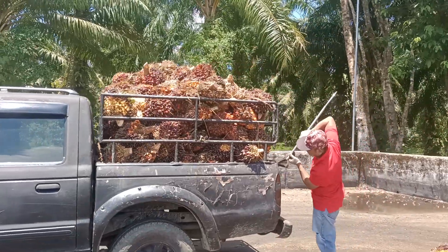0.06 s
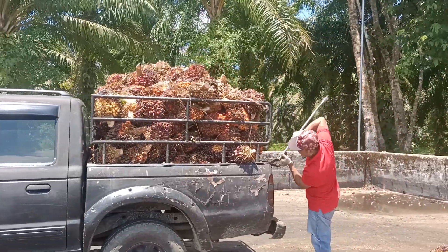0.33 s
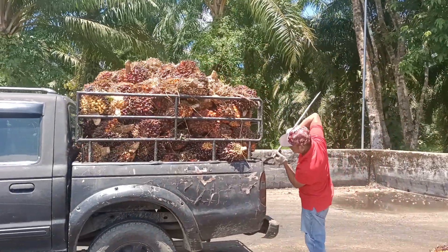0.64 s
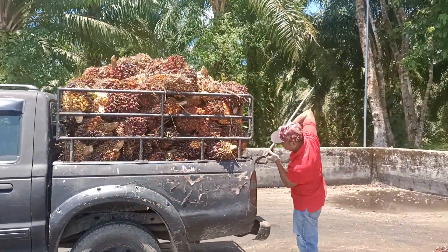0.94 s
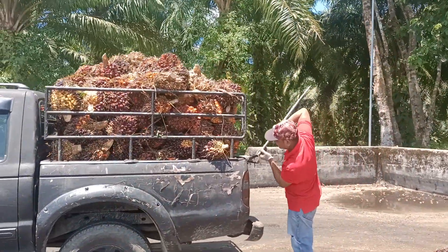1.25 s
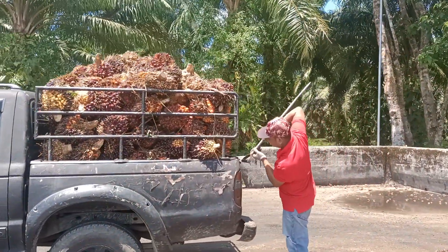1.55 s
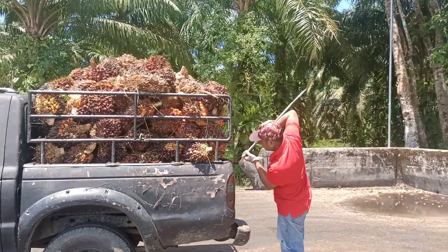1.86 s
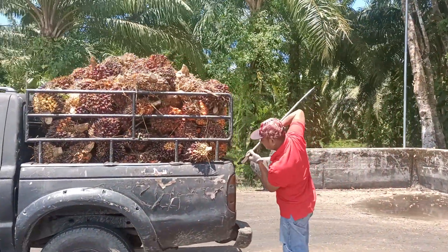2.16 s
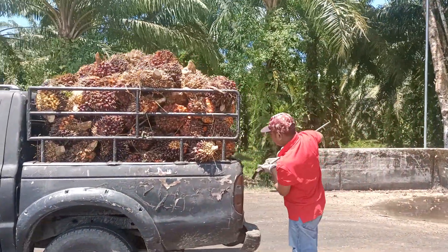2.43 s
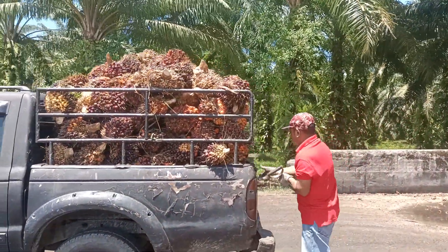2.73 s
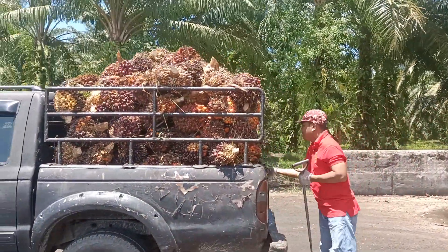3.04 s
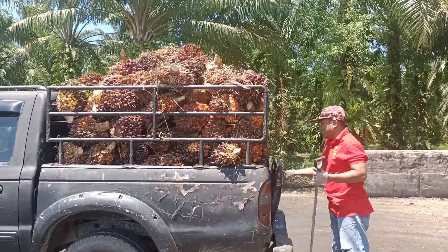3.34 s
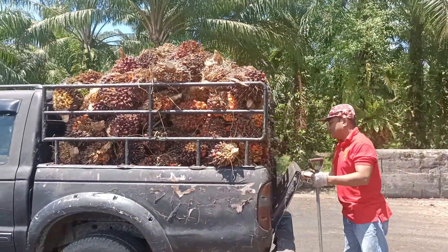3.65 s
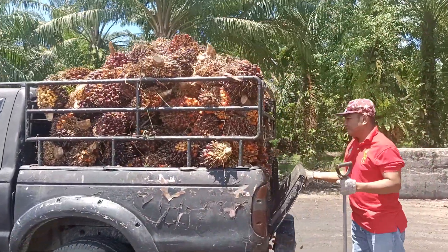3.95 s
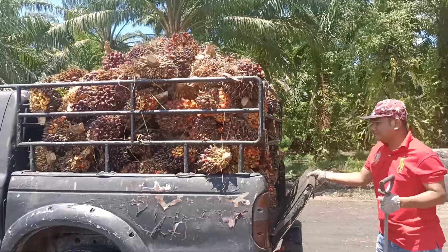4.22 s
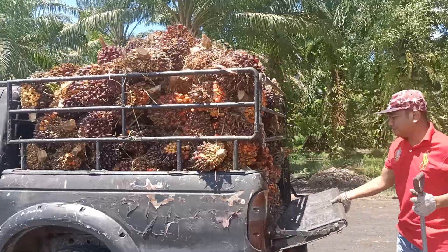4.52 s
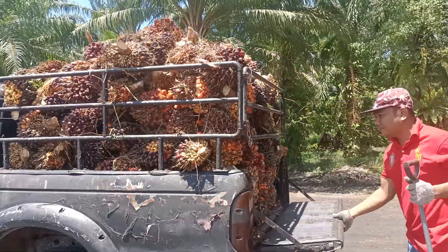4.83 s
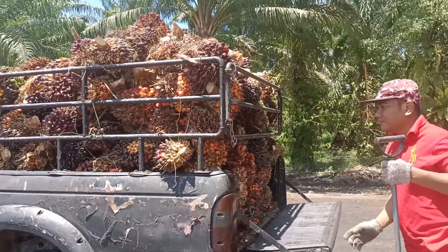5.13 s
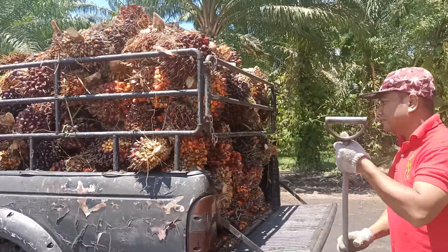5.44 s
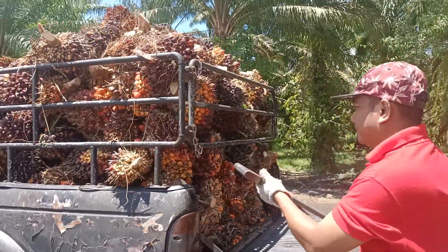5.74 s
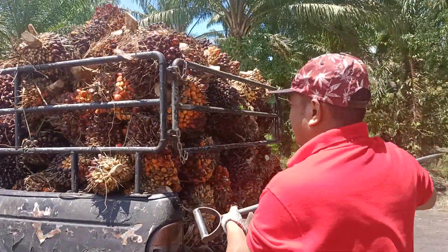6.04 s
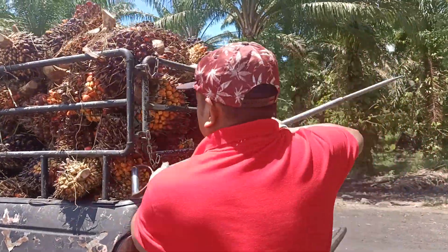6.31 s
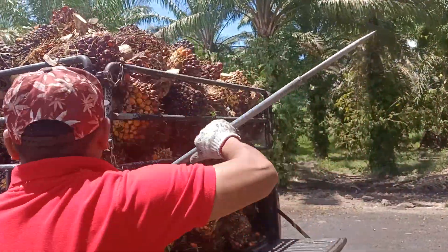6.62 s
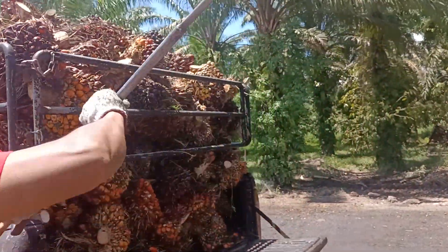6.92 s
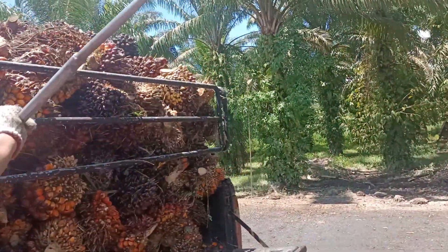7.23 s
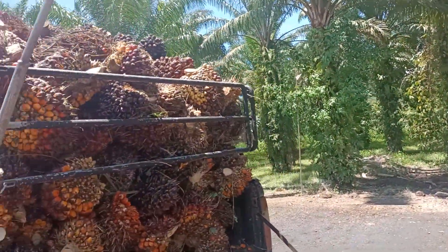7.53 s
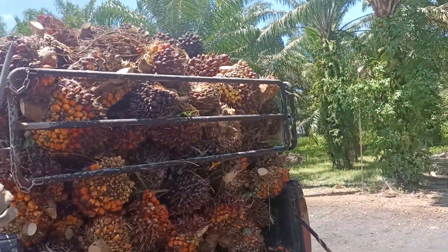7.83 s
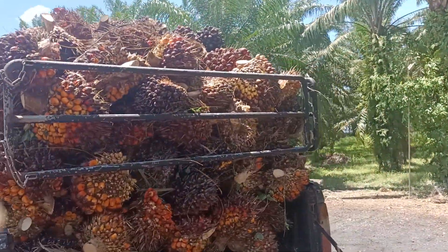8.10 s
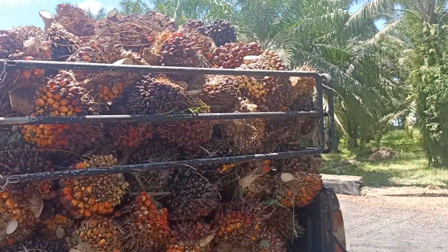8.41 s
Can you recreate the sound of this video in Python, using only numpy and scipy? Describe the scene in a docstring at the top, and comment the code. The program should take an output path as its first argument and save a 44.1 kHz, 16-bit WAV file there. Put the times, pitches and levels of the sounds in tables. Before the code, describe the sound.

A steel rod clangs on a pickup's tailgate latch, the gate crashes open as fruit tumbles, then closer blows rattle a rack and chain.

```python
"""A steel rod knocks six times on the tailgate latch of a loaded pickup, ringing on after the blows.
The microphone stands in an open yard, the gate a little way off to its right. The gate bursts open,
palm fruit tumbles against the sheet steel, and it drops onto its stays. Close by on the left, three
blows ring the tube rack and shake its chain. Dry husks rustle in the load, insects and a far bird
sound faintly in the palms, and a light breeze touches the microphone."""
import sys
import numpy as np
from scipy import signal
from scipy.fft import rfft, irfft, next_fast_len
from scipy.io import wavfile
from scipy.ndimage import map_coordinates

SR = 44100
rng = np.random.default_rng(int(sys.argv[2]) if len(sys.argv) > 2 else 0)


def int16_out(signal):
    """Quantize to a 16-bit WAV file."""
    q = np.round(np.clip(np.atleast_2d(signal).T, -1, 1) * 32767)
    wavfile.write(sys.argv[1], SR, q.astype(np.int16))


N = 377937
T = np.arange(SR) / SR  # seconds since a blow

# rod on the latch: start_s, clang_db, bed_boom_db, rod_low_db, rod_high_db (all levels are relative)
LATCH_BLOWS = [(-.018, -13, -24.5, -48.5, -32.5), (.491, -14, -28, -47, -49),
               (.878, -13.5, -28, -40.5, -34.5), (1.211, -11, -23, -31, -30),
               (1.529, -12.5, -22, -27.5, -61), (1.921, -9, -23.5, -57, -34)]
# the rod's bending modes: pitch_hz, t60_s
ROD_MODES = [(1136, 1.15), (4382, .8)]
# the gate strains, bursts open, then lands: start_s, crash_db, boom_db, clatter_s, rise_s
SLAMS = [(2.938, -62, -45.5, 0.085, 0.025), (3.363, -14.5, -16, 0.023, 0.0027),
         (4.714, -10.5, -17.5, 0.066, 0.042)]
# the heaviest bunches hit the gate: start_s, knock_db, scratch_db
BUNCH_HITS = [(3.029, -46.5, -55), (3.141, -45.5, -56), (3.617, -28.5, -68), (3.712, -34, -73),
              (3.756, -33.5, -64), (3.897, -30.5, -38.5), (3.993, -34.5, -43), (4.093, -20.5, -32.5),
              (4.199, -30.5, -46), (4.264, -34.5, -46), (4.413, -33.5, -38.5), (4.454, -23.5, -35),
              (4.679, -33, -51), (4.748, -27, -20), (4.875, -29, -30), (4.94, -34.5, -35.5)]
# rod on the rack: start_s, clang_db, tubes_db, clatter_s, chain_db
RACK_BLOWS = [(6.462, -11.5, -21, 0.014, -10.5), (6.844, -13, -25, 0.023, -9.5),
              (7.17, -12, -23, 0.038, -18)]
# the rack's tube modes: pitch_hz, level_db
TUBE_MODES = [(139, -8), (191, -1.5), (223, -2.5), (304, -2.5), (398, -0.5), (454, 6), (702, 9), (785, 4.5),
              (1117, 6.5), (1270, -5.5), (1450, -1.5), (1555, 15.5), (1725, -6.5), (1983, 1), (2306, -16.5)]
# dry stalks snap: start_s, level_db
SNAPS = [(2.651, -37), (3.18, -36.5), (3.23, -40), (6.384, -46), (6.772, -28.5), (7.473, -24.5),
         (7.512, -26), (8.452, -9)]
# a far bird: start_s, length_s, first_hz, last_hz, level_db
WHISTLES = [(2.256, 0.25, 5450, 5970, -70), (5.249, 0.074, 3880, 3990, -67)]

# modes of the struck bodies: pitch_hz, level_db, t60_s
ROD_OVERTONES = [(7020, -4, 0.32), (10280, -4.5, 0.24), (12040, 0.5, 0.23)]
LATCH_MODES = [(4530, -3.5, 0.068), (4870, 0.5, .04), (5150, -6.5, 0.072), (7450, -5, .03)]
BED_MODES = [(111, -8.5, 0.2), (138, 1.5, .24), (157, -8, 0.46), (177.8, 4, 0.28), (190, -1.5, 0.27),
             (237, -13.5, 0.35), (298, -2, 0.17), (357, 2.5, .2)]
SHUT_GATE_MODES = [(467, -4.5, 0.3), (485, -4.5, 0.15), (569, -8.5, 0.25), (699, -2, 0.2), (748, -5, 0.27),
                   (831, -2, 0.17), (872, 2, 0.078), (1228, -1, 0.14), (1374, -4.5, 0.22),
                   (1498, -10, 0.084), (1760, -12.5, 0.11), (1924, 3, 0.12)]
LOOSE_GATE_MODES = [(72, -37, 0.48), (106, -3.5, 0.11), (144.5, 0, 0.26), (172, -4.5, 0.32), (207, 4, 0.17),
                    (250, -5, 0.18), (317, -5.5, 0.14), (374.7, -4, 0.17), (440, -9.5, 0.27)]
OPEN_GATE_MODES = [(298.6, -7.5, 0.43), (468, -9, 0.14), (610.2, 0.5, 0.21), (687, -4.5, 0.23),
                   (786, -5.5, 0.15), (1157, 0.5, 0.075), (1603, -3, 0.077), (1988, 4, 0.036)]
LINK_MODES = [(9850, -9.5, .2), (10400, -1.5, .22), (14810, -7, 0.28), (15250, -10.5, .25),
              (15600, -11.5, 0.18)]
STALK_MODES = [(1090, -8.5, 0.011), (1360, -1, 0.014), (1770, -5.5, 0.013), (3250, -1, 0.0028)]

# sounds that swell and die away: start_s, length_s, level_db
SPILLS = [(2.981, 0.73, -65), (3.342, 0.038, -27), (3.588, 0.97, -38.5), (4.772, 0.14, -30.5)]  # fruit trickles behind the gate, pours down it, spills off as it lands
RUSTLES = [(2.56, 0.029, -59.5), (2.98, 0.021, -60), (3.225, .07, -52.5), (5.455, 0.055, -64),
           (5.853, 0.027, -45), (5.975, 0.055, -54), (6.315, 0.071, -46.5), (7.39, 0.013, -36),
           (7.45, 0.057, -38), (7.585, 0.012, -51), (7.96, 0.028, -58), (8.275, 0.2, -48.5)]  # the load settles; the short bursts at 7.39 and 7.45 s sound with the chain's last swing
PUFFS = [(-.03, 0.086, -35), (.16, 0.055, -40), (1.76, 0.19, -44), (7.87, 0.082, -50), (8.06, .13, -36.5),
         (8.46, .04, -57)]  # breeze on the microphone
DRAUGHT = [(0.0099, 2.1, -61)]  # light wind that drops early

# steady background: time_s, level_db
AIR_LEVEL = [(0, -51.5), (2.5, -58), (8.6, -58.5)]
INSECT_LEVEL = [(0, -55), (2, -64.5), (3, -66.5), (5.6, -64.5), (8.6, -66.5)]

# noise spectrum of each source: frequency_hz, level_db
LATCH_COLOUR = [(45, -32.5), (90, -14), (150, -8.5), (400, -4), (900, -3.5), (1850, -3), (2600, -9),
                (3200, -16.5), (4300, -5), (5500, -10), (8000, -15), (10000, -15.5), (15500, -23.5)]
SLAM_COLOUR = [(30, -36.5), (80, -2), (150, -10), (500, -5.5), (950, -12.5), (1200, -6), (1700, -7),
               (2500, -18.5), (3200, -29.5), (4400, -18), (6700, -24), (8000, -26.5), (15500, -36)]
FRUIT_COLOUR = [(70, -54.5), (120, -21), (190, -2.5), (300, -6), (450, -4), (650, -2.5), (1000, -7.5),
                (1950, -13.5), (3000, -33.5), (4500, -28), (8000, -52.5), (15500, -45.5)]
SPINE_COLOUR = [(800, -20.5), (1800, -6), (3000, -7.5), (5000, -1.5), (8000, -6.5), (15000, -16.5)]
RACK_COLOUR = [(50, -39.5), (90, -21.5), (150, -9.5), (450, -11), (700, -2), (950, -4.5), (1550, 2),
               (2500, -4.5), (3500, -11), (4400, -5.5), (6700, -15.5), (8000, -18), (10000, -19),
               (15500, -31.5)]
LOAD_COLOUR = [(80, -27), (140, -7), (200, 0.5), (300, -0.5), (420, -1), (560, -12.5), (1200, -23),
               (3000, -47)]
CHAIN_COLOUR = [(800, -18), (1500, -9.5), (3000, -14.5), (6500, -7.5), (8000, -16), (10500, -5.5),
                (12500, -13.5), (14300, -16), (15200, -5), (16000, -9.5)]
HUSK_COLOUR = [(300, -28.5), (700, -12.5), (1200, -4), (1600, 1), (2100, -3), (3000, -15), (5000, -11),
               (8000, -21.5), (15500, -35)]
FIBRE_COLOUR = [(1000, -12), (2000, -1.5), (5000, 0), (8000, -5.5), (15000, -3)]
BREEZE_COLOUR = [(12, -27), (20, 1), (59, 1.5), (130, -7), (199, -28), (350, -53.5), (460, -87),
                 (770, -120)]
AIR_COLOUR = [(20, 0), (60, -1), (150, 0), (300, -10), (550, -16), (1000, -19), (1700, -17), (3500, -29),
              (5000, -26), (7000, -27), (9500, -28), (12000, -33), (15500, -27)]

# how long the steel, the load and the yard sound on: frequency_hz, t60_s
SHEET_DECAY = [(150, 0.62), (400, .3), (1000, 0.2), (2000, 0.17), (4000, .09), (12000, 0.071)]
SLAM_DECAY = [(50, 0.26), (150, 0.75), (400, 0.43), (1500, 0.081), (6000, 0.36), (12000, 0.26)]
RACK_DECAY = [(150, 0.38), (500, 0.38), (1500, 0.23), (4000, 0.13), (12000, 0.14)]
TUBE_DECAY = [(200, 0.34), (500, 0.2), (1500, 0.16)]
LOAD_DECAY = [(150, 0.2), (600, 0.23)]
YARD_DECAY = [(150, 0.46), (1000, 0.53), (4000, 0.62), (12000, 0.77)]

# left-right likeness of far and near sound at the microphone: frequency_hz, correlation
FAR = [(60, 0.8), (130, .95), (300, 0.9), (640, .82), (1400, 0.5), (3100, 0.2), (7000, 0.6)]
NEAR = [(130, 0.58), (300, 1), (640, 0.73), (1400, 0.088), (7000, 0.17)]
# the two microphone ports ring and cancel at different pitches: frequency_hz, gain_db
LEFT_PORT = [(300, 2), (1500, -1.5), (2600, 0.5), (4400, -5.5), (5300, -6), (6700, -17), (7700, -11),
             (8400, -0.5), (9700, 7.5), (11300, -2.5), (12600, 3), (14000, -6.5), (15300, -8)]
RIGHT_PORT = [(300, 1), (1500, 1), (2600, -2), (4400, 0.5), (5700, -0.5), (6700, 5.5), (8000, -1),
              (8600, -15), (10000, -30.5), (10700, -15), (11400, -15.5), (12700, 0), (14000, 0.5),
              (15300, 7)]


def latch():
    """Each blow cracks on the gate, swells into the truck bed, rebounds and leaves the rod ringing."""
    out = np.zeros((2, N))
    sheet = resonant(LATCH_COLOUR, depth_db=2)
    rebound_decay = [(300, 0.16), (2000, 0.066), (8000, 0.021)]
    next_blows = [row[0] for row in LATCH_BLOWS[1:]] + [N / SR]
    for (s, db, boom_db, *rod_db), next_s in zip(LATCH_BLOWS, next_blows):
        add(out, s, amp(db + 1.5) * clang(sheet, SHEET_DECAY, FAR, hold=.0018, rise=.00052, grain_db=3))
        add(out, s, amp(db - 12.5) * ring(SHUT_GATE_MODES, rise=0.0018))
        add(out, s + 0.022, amp(boom_db) * ring(BED_MODES, rise=0.0087))
        rebound = clang(sheet, rebound_decay, FAR, hold=0, rise=0.003, grain_db=6)
        add(out, s + 0.047, amp(db - 6) * rebound)
        add(out, s + 0.051, amp(db - 32 + 2 * rng.standard_normal()) * ring(LATCH_MODES, rise=0.0027))
        add(out, s, amp(db - 29.5) * ring(ROD_OVERTONES, rise=0.001))
        free = np.clip((next_s - s - T) / 0.13, 0, 1)  # pressed back on the latch, the rod stops ringing
        for (hz, t60), ring_db in zip(ROD_MODES, rod_db):
            waver = amp(1.5 * wobble(14, SR))  # the rod turns in the hands
            tone = np.sin(2 * np.pi * hz * T + np.array([[0], [0.7]]))
            add(out, s, free * waver * amp(ring_db - 60 * T / t60) * tone)
    return out * amp([[-0.2], [0.2]])


def tailgate():
    """The gate strains faintly, then crashes and booms as it lets go and again on its stays."""
    out = np.zeros((2, N))
    panel = resonant(SLAM_COLOUR, depth_db=2)
    for s, db, boom_db, hold, rise in SLAMS:
        add(out, s, amp(db) * clang(panel, SLAM_DECAY, FAR, hold, rise, grain_db=2))
        add(out, s, amp(boom_db - 2.5) * ring(LOOSE_GATE_MODES, rise=0.024))
    return out * amp([[-0.4], [0.4]])


def fruit():
    """Bunches knock and scratch on the tilting gate while loose fruits rattle down it."""
    panel = resonant(FRUIT_COLOUR, depth_db=3)
    lumps = amp(3.2 * wobble(45, N))
    flow = swells(SPILLS, rise=0.03, fall_db_per_s=87.5)
    rattle = unit(noise(panel, FAR, N, grain_db=5) * lumps)
    spine_drag = unit(noise(SPINE_COLOUR, NEAR, N, grain_db=3.5) * lumps)
    out = flow * (rattle + amp(-19) * spine_drag)
    for s, knock_db, scratch_db in BUNCH_HITS:
        add(out, s, amp(knock_db) * knock(panel) + amp(scratch_db) * scratch())
    # lighter knocks come unevenly, as strong as the flow is at that moment
    knocks_per_s = 7
    slots = np.arange(SPILLS[0][0], SPILLS[-1][0] + 0.5, 1 / knocks_per_s)
    for s in slots + rng.uniform(0, 1, len(slots)) / knocks_per_s:
        add(out, s, flow[round(s * SR)] * amp(0.5) * knock(panel))
    return out * amp([[-0.6], [0.6]])


def knock(panel):
    """One bunch thuds on the gate and sets it ringing."""
    decay = [(200, 0.49), (800, 0.098), (2500, 0.34), (9000, 0.057)]
    thud = clang(panel, decay, FAR, hold=0.021, rise=0.00062, grain_db=4)
    add(thud, 0, amp(-6.5) * ring(OPEN_GATE_MODES, rise=0.0014))
    return thud


def scratch():
    """Spines drag over the steel in a short, bright spurt."""
    return clang(SPINE_COLOUR, [(2000, 0.17), (10000, 0.087)], NEAR, hold=.002, rise=.0004, grain_db=1)


def rack():
    """Struck close to the microphone, the rack chatters and rings; the load rocks and fibres crackle."""
    out = np.zeros((2, N))
    frame = resonant(RACK_COLOUR, depth_db=3.5)
    tubes = np.c_[TUBE_MODES, along(TUBE_DECAY, np.array(TUBE_MODES)[:, 0])]  # damped by the load
    crackle_colour = [(1500, -24), (4000, -2.5), (9000, 2.5), (15000, 4.5)]
    for s, db, tubes_db, hold, _ in RACK_BLOWS:
        add(out, s, amp(db) * clang(frame, RACK_DECAY, NEAR, hold, rise=0.00094, grain_db=3.5))
        add(out, s, amp(tubes_db) * ring(tubes, rise=0.013))
        rocking = clang(LOAD_COLOUR, LOAD_DECAY, NEAR, hold + 0.012, rise=0.012, grain_db=4)
        add(out, s + 0.022, amp(db - 9.5) * rocking)
        crackle = noise(crackle_colour, NEAR, SR, grain_db=19.5)
        add(out, s, amp(db - 14.5 - 60 * T / 0.3) * crackle)
    return out


def chain():
    """Each blow throws the chain on the rack twice; every clash rebounds once and rings the links."""
    out = np.zeros((2, N))
    links = resonant(CHAIN_COLOUR, depth_db=5.5)
    swing_s, swing_loss_db = 0.215, 13
    rebound_s, rebound_loss_db = 0.083, 11.5
    clashes = [(s + swing * swing_s + rebound * rebound_s,
                db - swing * swing_loss_db - rebound * rebound_loss_db)
               for s, *_, db in RACK_BLOWS for swing in range(2) for rebound in range(2)]
    for s, db in clashes:
        jingle = clang(links, [(2000, 0.48), (12000, 0.24)], NEAR, hold=.0054, rise=.00075, grain_db=1.5)
        add(out, s, amp(db - 2.5) * jingle)
        detune = 1 + 0.002 * rng.standard_normal()
        modes = np.array(LINK_MODES) * [detune, 1, 1]
        add(out, s, amp(db - 23.5) * ring(modes, rise=0.002, scatter_db=3))
    return out


def husks():
    """Dry fibres rustle and tick in the settling load, and now and then a stalk snaps."""
    settling = amp(-72.5 + 4.5 * wobble(12, N))
    stir = swells(RUSTLES, rise=0.0083, fall_db_per_s=336) + settling
    rustle = noise(resonant(HUSK_COLOUR, depth_db=3), NEAR, N, grain_db=5.5)
    ticks = noise(FIBRE_COLOUR, NEAR, N, grain_db=12)
    out = stir * (rustle + amp(-9.5) * ticks)
    for s, db in SNAPS:
        add(out, s, amp(db - 19) * ring(STALK_MODES, rise=0.0004, scatter_db=1))
        crunch = clang(HUSK_COLOUR, [(1500, 0.097), (8000, 0.05)], NEAR, hold=0, rise=.0004, grain_db=8)
        add(out, s, amp(db - 20) * crunch)
    return out


def yard(x):
    """The low wall and the palms scatter a tail back to the microphone."""
    scatter = noise([(100, -2.3), (3000, 0.41), (14000, -0.99)], FAR, SR)
    tail = fade(scatter, YARD_DECAY) * (1 - np.exp(-T / 0.0091))
    return signal.fftconvolve(x, tail / np.linalg.norm(tail[0]), axes=1)[:, :N]


def outdoors():
    """Open air murmurs, insects hiss in the palms, and the breeze rumbles on the microphone."""
    air = level(AIR_LEVEL) * noise(AIR_COLOUR, FAR, N)
    insect_colour = [(6000, -15), (6900, -5), (7450, 3.5), (7850, -6.5), (8400, -51.5)]
    insects = level(INSECT_LEVEL) * noise(insect_colour, NEAR, N)
    puffs = swells(PUFFS, rise=0.034, fall_db_per_s=165.5)
    draught = swells(DRAUGHT, rise=0.034, fall_db_per_s=19.5)
    breeze = (puffs + draught) * noise(BREEZE_COLOUR, [(50, 0.2)], N)
    return air + insects + breeze


def bird():
    """Far off, a bird gives two faint rising whistles."""
    out = np.zeros((2, N))
    for s, length, first_hz, last_hz, db in WHISTLES:
        progress = np.minimum(T / length, 1)
        phase = 2 * np.pi * np.cumsum(first_hz + progress * (last_hz - first_hz)) / SR
        add(out, s, amp(db) * np.sin(np.pi * progress) * np.sin(phase)[None])
    return out


def clang(colour, decay, likeness, hold, rise, grain_db):
    """A struck body's crowd of unresolved modes, kept going for hold seconds as loose parts clatter."""
    x = noise(colour, likeness, SR, grain_db)
    x = x / np.sqrt(np.mean(x[:, :SR // 20] ** 2))
    return fade(x, decay, hold) * (1 - np.exp(-T / rise))


def ring(modes, rise, scatter_db=2):
    """Distinct modes, newly weighted at each blow; high ones reach the two ports out of step."""
    hz, db, t60 = np.transpose(modes)[:, :, None]
    weight, phase, skew = rng.standard_normal((3, len(modes), 1))
    t = T[:SR // 2]
    envelope = amp(db + scatter_db * weight - 60 * t / t60) * (1 - np.exp(-t / rise))
    angle = 2 * np.pi * (hz * t + phase)
    apart = skew * np.minimum(hz / 2000, 1.5)
    x = np.array([(envelope * np.sin(angle + side * apart)).sum(0) for side in (-1, 1)])
    return x / np.sqrt(np.mean(x[:, :SR // 12] ** 2))


def resonant(colour, depth_db):
    """Give a body its own fine pattern of crowded resonances, the same at every blow."""
    hz = np.arange(20, 17000, 40)
    ripple = rng.uniform(-1, 1, len(hz)) * np.minimum(hz / 1500, 1)
    return np.c_[hz, along(colour, hz) + 2 * depth_db * ripple]


def noise(colour, likeness, size, grain_db=0):
    """Coloured stereo noise of rms 1; grain_db clumps it into millisecond contacts."""
    white = rng.standard_normal((2, size)) * amp(grain_db * wobble(700, size))
    m = next_fast_len(size)
    hz = np.fft.rfftfreq(m, 1 / SR)
    width = np.arccos(np.clip(along(likeness, hz), -1, 1)) / 2
    spectrum = rfft(white, m) * amp(along(colour, hz))
    mid, side = irfft(spectrum * [np.cos(width), np.sin(width)], m)[:, :size]
    return unit(np.array([mid + side, mid - side]))


def fade(x, decay, hold=0):
    """After hold seconds each frequency dies at its own speed."""
    hz, t, spectra = signal.stft(x, SR, nperseg=256)
    gain = amp(-60 * np.maximum(t - hold, 0) / along(decay, hz)[:, None])
    return signal.istft(spectra * gain, SR, nperseg=256)[1][:, :x.shape[1]]


def swells(rows, rise, fall_db_per_s):
    """Gain per sample of events that come up over rise seconds, hold and die away."""
    t = np.arange(N) / SR
    return sum(np.clip((t - s) / rise, 0, 1) * amp(db - fall_db_per_s * np.maximum(t - s - length, 0))
               for s, length, db in rows)


def level(rows):
    """Gain per sample from time_s, level_db points."""
    s, db = np.transpose(rows)
    return amp(np.interp(np.arange(N) / SR, s, db))


def wobble(rate, size):
    """A random curve with rate knots a second."""
    knots = rng.standard_normal(int(size * rate / SR) + 4)
    return map_coordinates(knots, [np.arange(size) * rate / SR], order=1)


def along(points, hz):
    """Read frequency_hz, value points on a log axis."""
    point_hz, values = np.transpose(points)
    return np.interp(np.log(hz + 1), np.log(point_hz + 1), values)


def amp(db):
    """Decibels to gain."""
    return 10 ** (np.asarray(db) / 20)


def unit(x):
    """Scale to rms 1."""
    return x / np.sqrt(np.mean(x ** 2) + 1e-20)


def add(track, s, sound):
    """Mix a sound into a track at s seconds."""
    start = round(s * SR)
    part = sound[:, max(-start, 0):N - start]
    track[:, max(start, 0):max(start, 0) + part.shape[1]] += part


def placed(x, left_lag=0, right_lag=0):
    """Sound reaches the farther port a few samples late."""
    return np.array([np.pad(side, (lag, 0))[:N] for side, lag in zip(x, (left_lag, right_lag))])


def scene():
    """From the microphone the gate is to the right, the rack close on the left; the yard answers both."""
    gate = placed(latch() + tailgate() + fruit(), left_lag=3)
    truck = gate + placed(rack() + chain(), right_lag=4)
    return truck + amp(-15.5) * yard(truck) + husks() + outdoors() + bird()


def record(dry):
    """Each microphone port colours its side; the recorder rounds off peaks and cuts the top treble."""
    ceiling, top_hz = 0.95, 15550
    m = next_fast_len(N + SR // 2)
    hz = np.fft.rfftfreq(m, 1 / SR)
    ports = amp([along(LEFT_PORT, hz), along(RIGHT_PORT, hz)])
    heard = irfft(rfft(dry, m) * ports, m)
    rounded = heard / (1 + np.abs(heard / ceiling) ** 6) ** (1 / 6)
    return irfft(rfft(rounded) / np.sqrt(1 + (hz / top_hz) ** 220), m)[:, :N]


dry = scene()
out = record(dry)
int16_out(out)
```